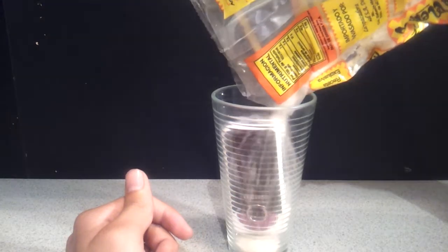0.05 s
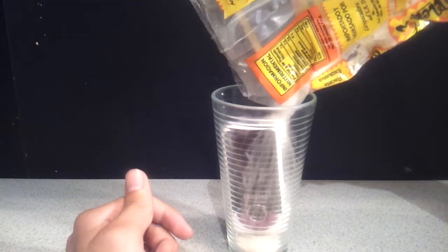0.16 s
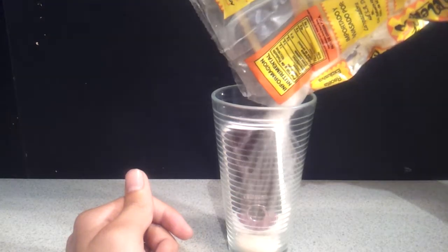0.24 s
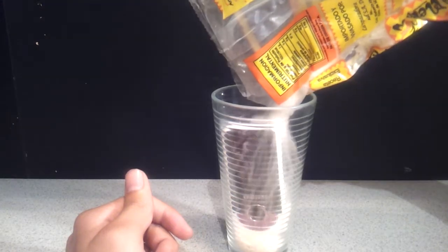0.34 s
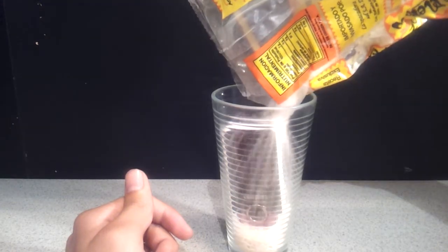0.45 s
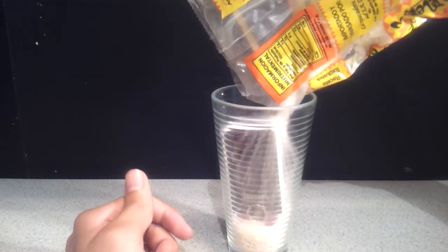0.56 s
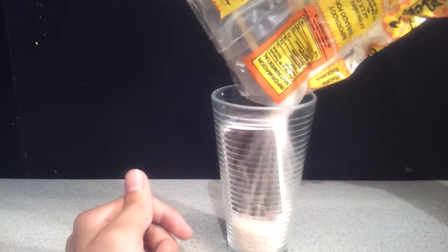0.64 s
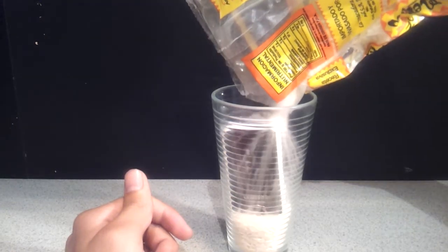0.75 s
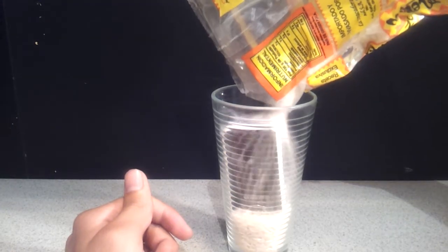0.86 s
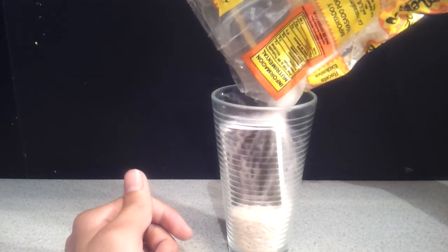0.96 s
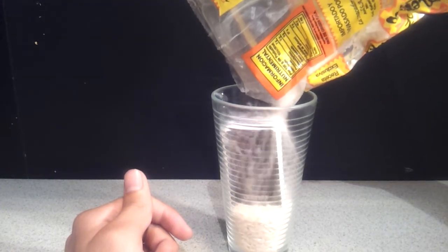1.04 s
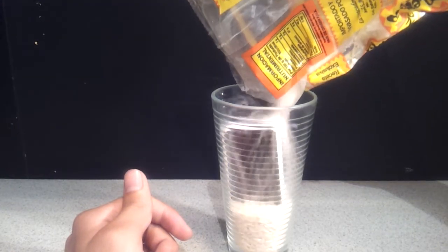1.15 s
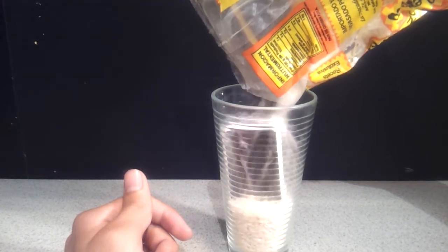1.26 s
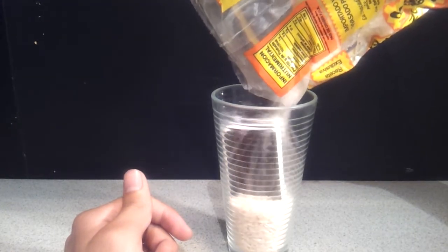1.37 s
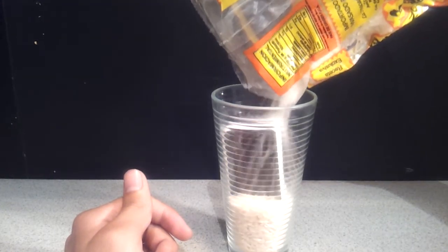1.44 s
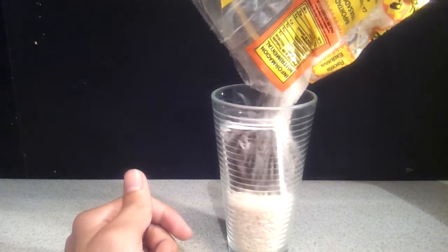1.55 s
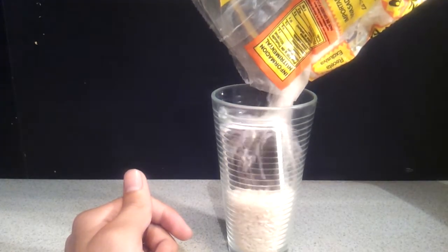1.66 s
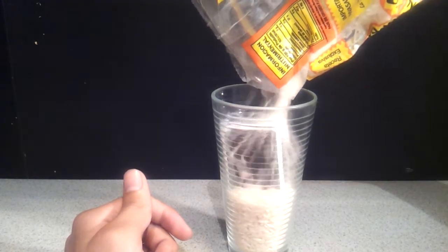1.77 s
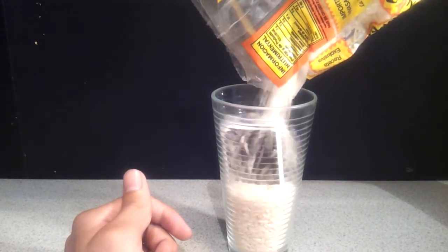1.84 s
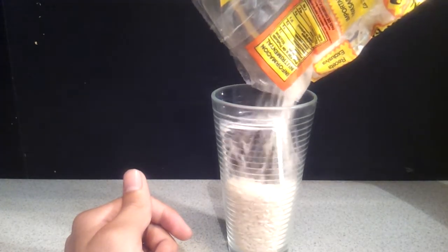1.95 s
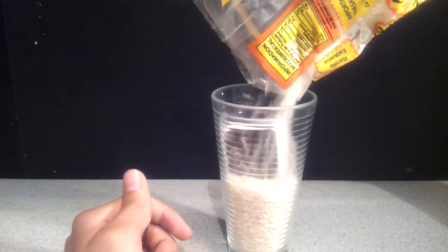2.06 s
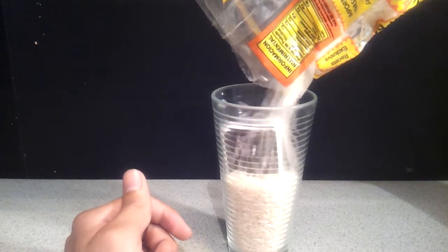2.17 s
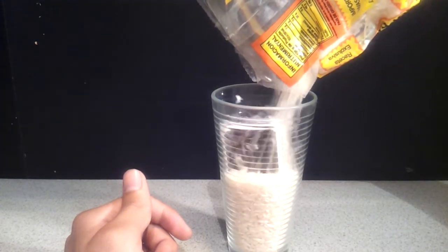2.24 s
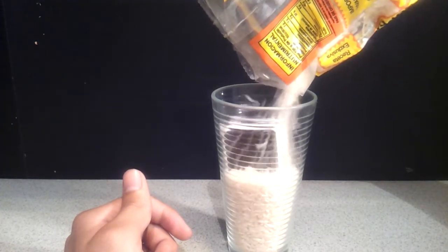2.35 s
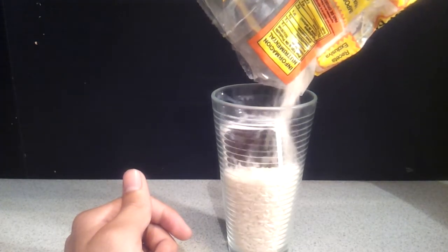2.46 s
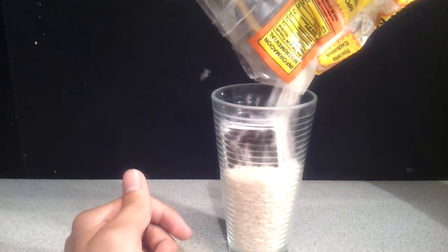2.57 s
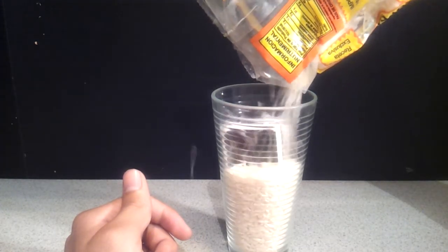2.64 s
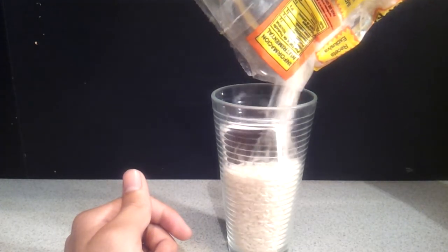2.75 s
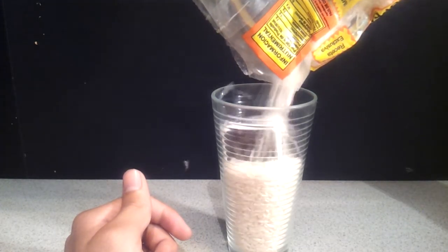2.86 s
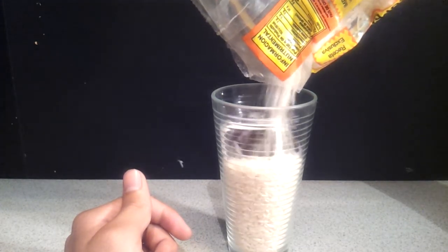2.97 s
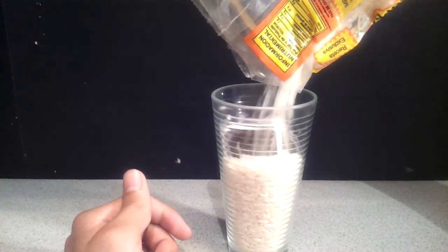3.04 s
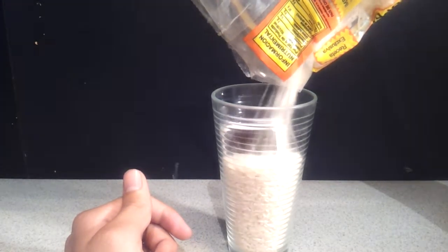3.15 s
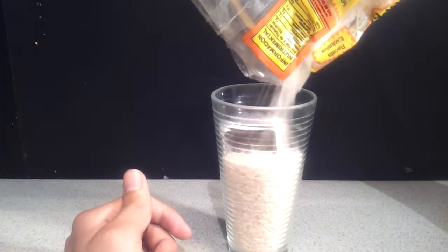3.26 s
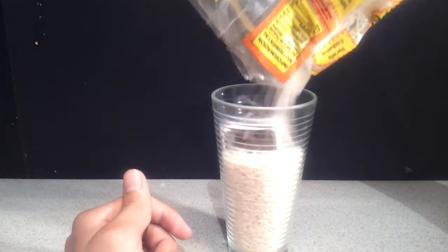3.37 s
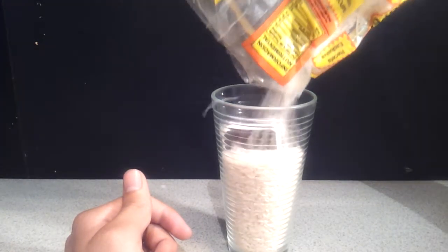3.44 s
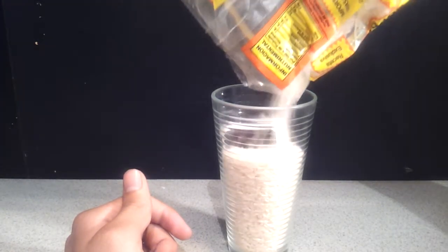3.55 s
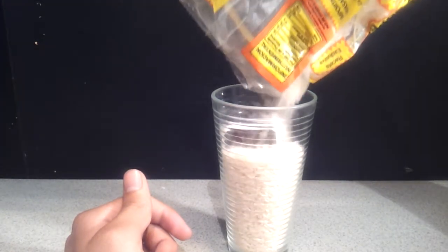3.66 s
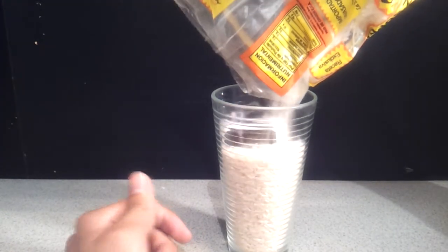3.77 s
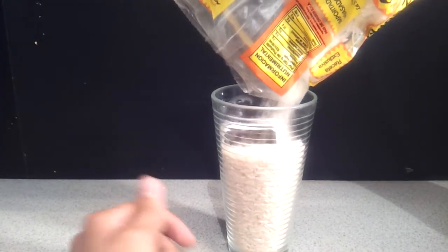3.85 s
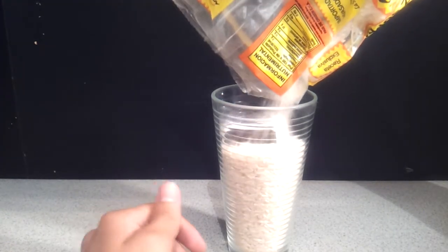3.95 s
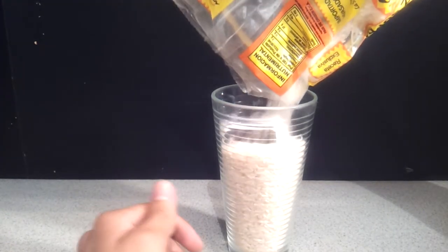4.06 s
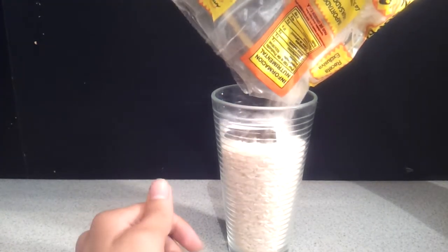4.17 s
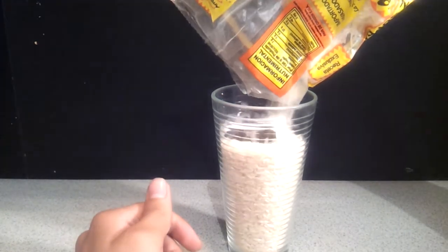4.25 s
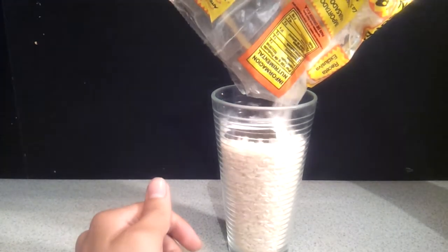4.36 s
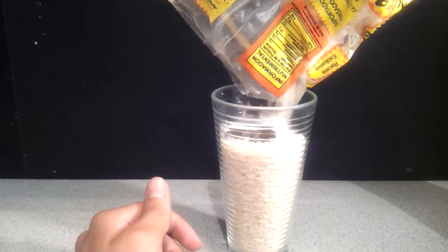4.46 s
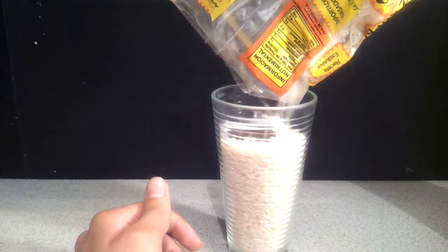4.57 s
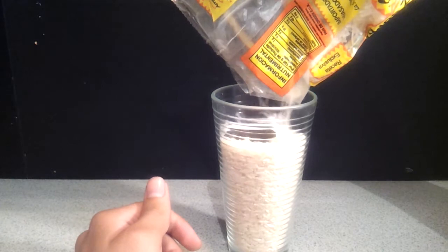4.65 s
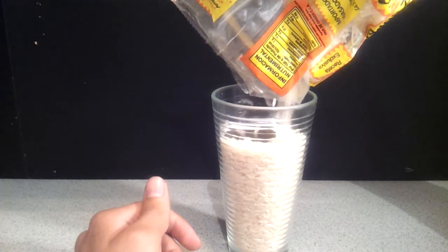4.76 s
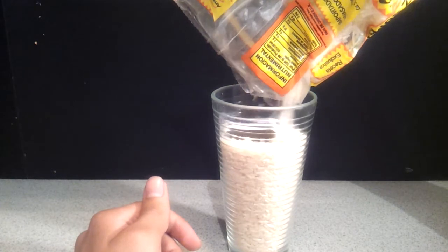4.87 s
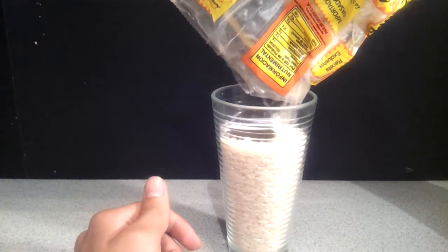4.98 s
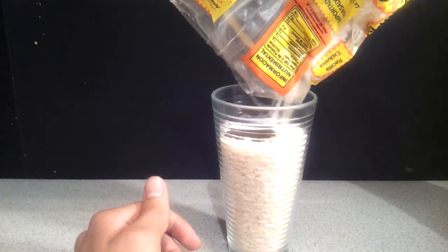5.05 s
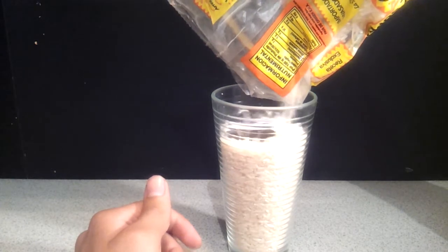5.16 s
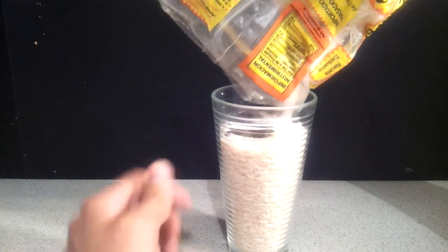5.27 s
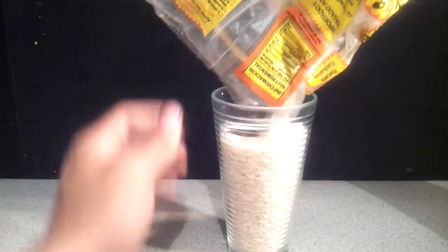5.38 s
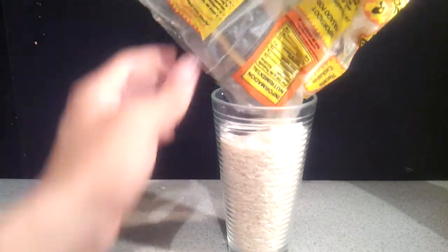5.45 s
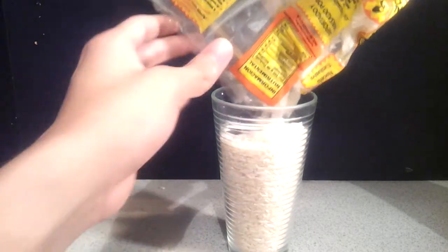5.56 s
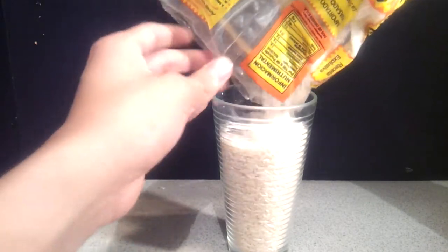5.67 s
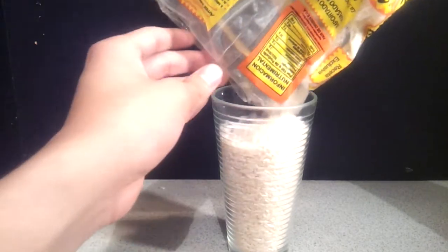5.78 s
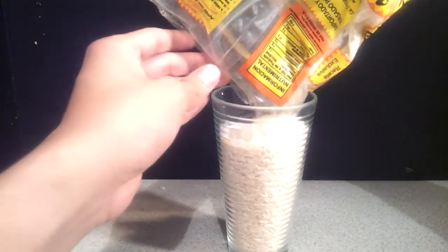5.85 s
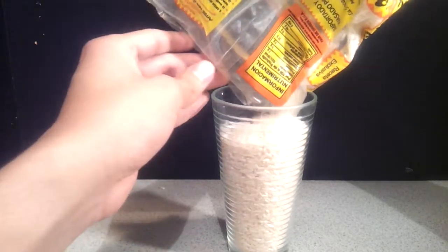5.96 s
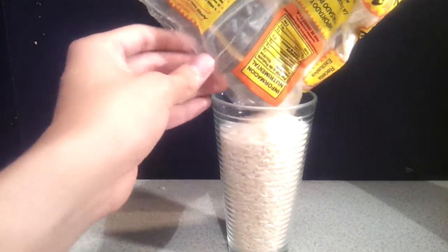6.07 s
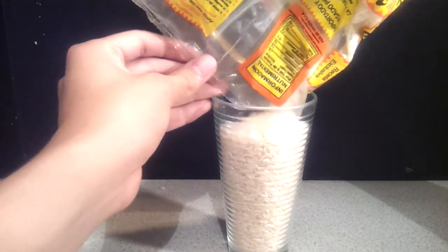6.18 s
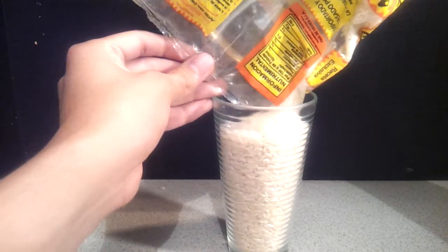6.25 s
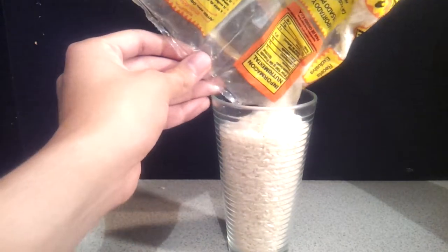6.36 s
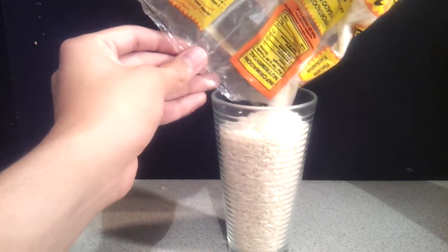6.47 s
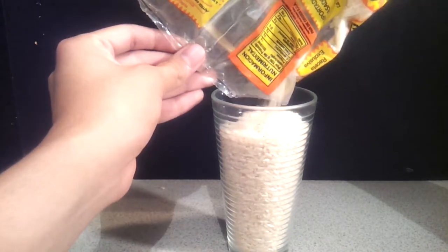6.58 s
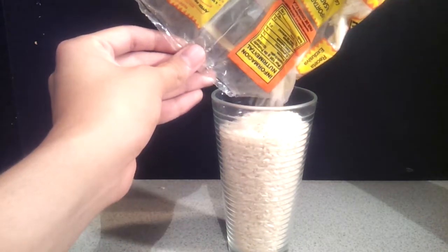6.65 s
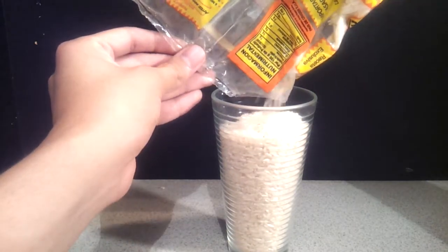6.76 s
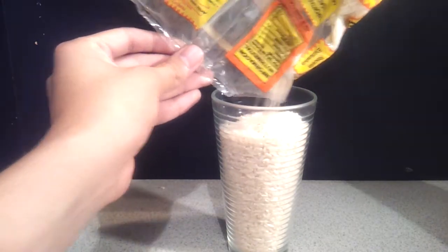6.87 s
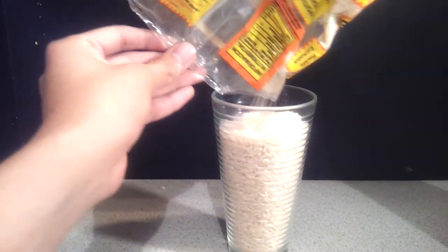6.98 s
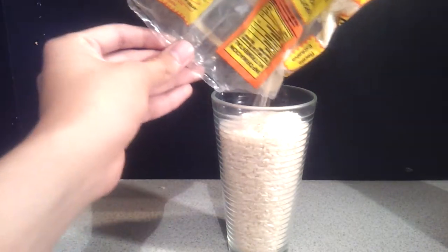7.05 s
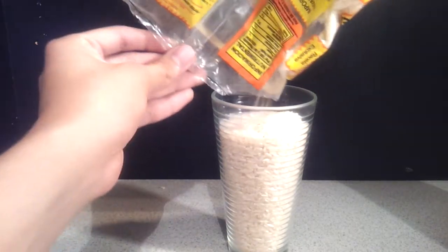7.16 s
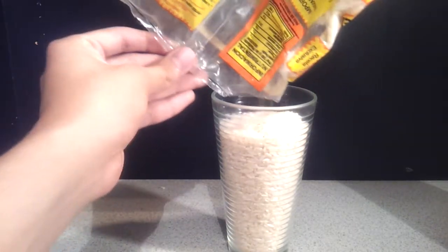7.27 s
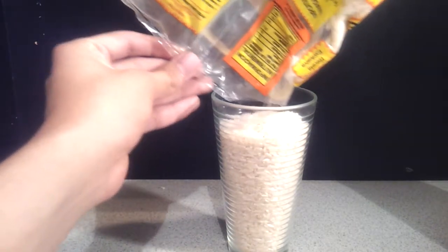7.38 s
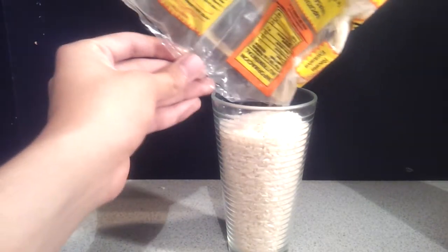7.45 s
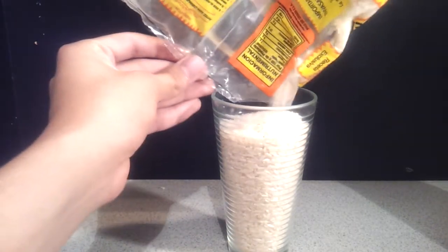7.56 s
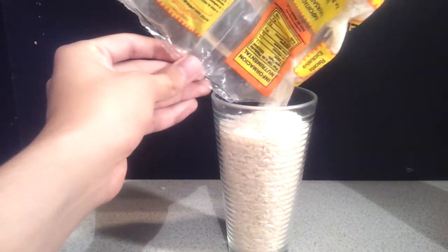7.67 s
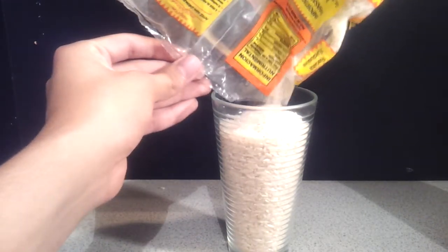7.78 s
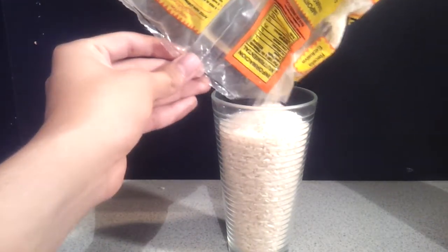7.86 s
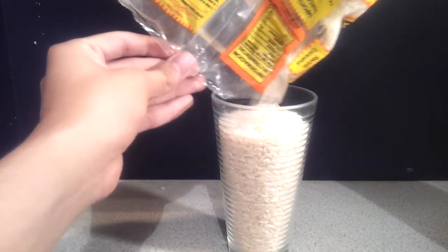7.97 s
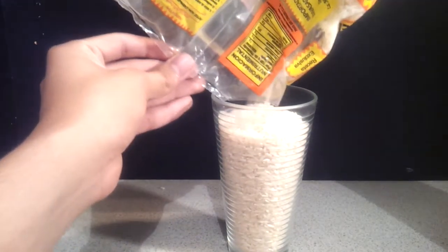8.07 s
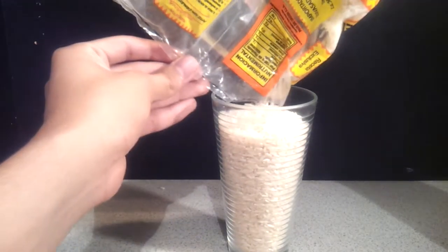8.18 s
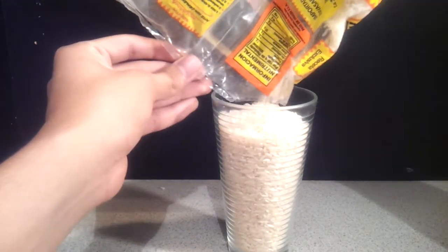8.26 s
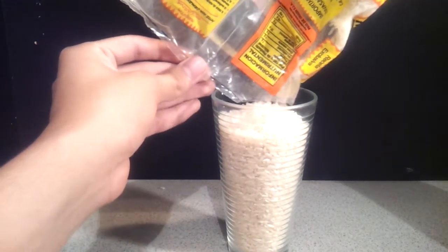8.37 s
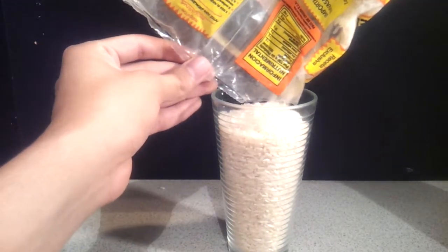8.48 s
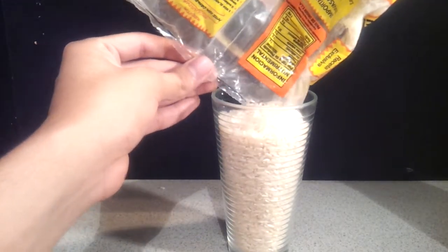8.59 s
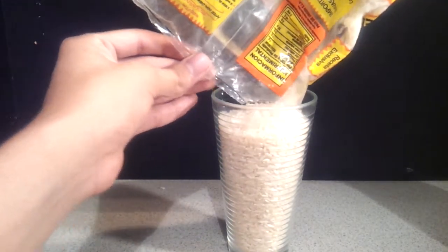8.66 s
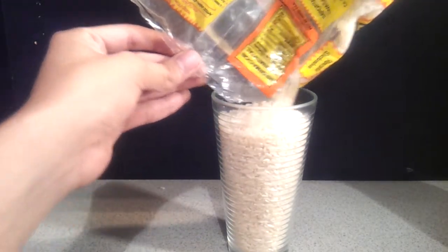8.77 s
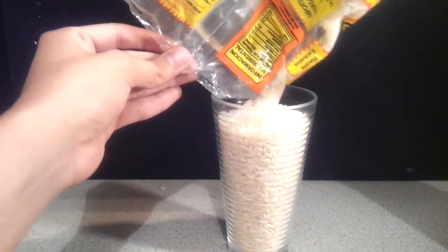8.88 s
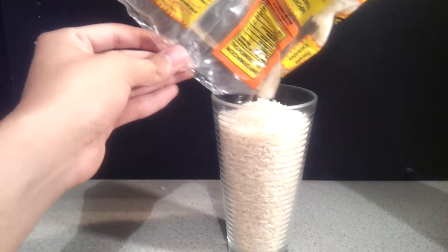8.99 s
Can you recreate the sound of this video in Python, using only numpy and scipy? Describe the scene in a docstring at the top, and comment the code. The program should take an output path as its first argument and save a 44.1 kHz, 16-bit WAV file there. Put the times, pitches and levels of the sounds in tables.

```python
"""Dry rice pours from a plastic bag into a tall glass on a table, heard close up in a small room.
The grains patter on the pile, hiss, and ring the glass until the rising pile chokes its modes.
Clumps tumble out and knock on the pile; the film crackles as a hand shakes out the rest.
One flow curve drives the stream and builds the pile; `fill` is its height as a share of the glass."""
import sys
import numpy as np
from scipy import signal
from scipy.io import wavfile
from scipy.ndimage import uniform_filter1d

SR = 44100
rng = np.random.default_rng(int(sys.argv[2]) if len(sys.argv) > 2 else 0)


def persist_wave(psi):
    """Save psi, clipped to +-1, as 16-bit WAV."""
    counts = np.round(np.clip(psi, -1, 1) * 32767).astype(np.int16)
    wavfile.write(sys.argv[1], SR, np.atleast_2d(counts).T)


N = 397782
TIME = np.arange(N) / SR

# colour of grains landing on the pile: f/Hz, level/dB
PATTER_COLOUR = [(100, -34), (400, -16.5), (800, -6), (990, -8), (1200, 2.5), (1420, -3.5), (1850, 2),
                 (2250, -4), (2420, -3.5), (2700, -4.5), (3500, -7), (5000, -12), (14000, -39.5)]
# modes of the pile in the glass: f/Hz, level/dB, t60/s
PILE_MODES = [(1186, 6.5, 0.013), (1360, 0, 0.015), (1570, -4, 0.044), (1865, 1.5, 0.014),
              (1980, 2.5, 0.028), (2385, -1.5, 0.042), (2810, 5, 0.021), (3240, 3, 0.016)]


def gain_of(db):
    """Decibels to amplitude."""
    return 10 ** (np.asarray(db) / 20)


def unit_rms(x):
    """Scales to rms 1."""
    return x / np.sqrt(np.mean(x ** 2) + 1e-20)


def unit_peak(x):
    """Scales to peak 1."""
    return x / abs(x).max()


def at_hz(points, hz):
    """Reads a curve along a log-frequency axis."""
    f, value = np.transpose(points)
    return np.interp(np.log(hz + 1), np.log(f + 1), value)


def add(mix, s, sound):
    """Lays a sound into the mix at time s."""
    part = mix[:, round(s * SR):][:, :sound.shape[1]]
    part += sound[:, :part.shape[1]]


def pan(lean_db):
    """Left and right gains at constant total power."""
    pair = gain_of([lean_db / 2, -lean_db / 2])
    return pair / np.sqrt(np.mean(pair ** 2, axis=0))


def swells(rows):
    """A sum of bell curves, each with its own rise and fall."""
    return sum(height * np.exp(-((TIME - s) / np.where(TIME < s, rise, fall)) ** 2)
               for s, height, rise, fall in rows)


def follow(flow_db, fill, empty_half_full_db, slope):
    """A fader that rides the height of the pile, plus `slope` dB per dB of flow."""
    return gain_of(np.interp(fill, [0, .5, 1], empty_half_full_db) + slope * flow_db)


def burst(colour, decay_s, tilt_db=0, size=4096, head=0):
    """One stereo contact: a sharp head and dying noise, coloured and tilted by tilt_db per octave."""
    # stereo width: f/Hz, left-right correlation
    correlation = [(100, .9), (400, .95), (1800, .92), (2800, .72), (3300, .8), (4200, .5), (5500, .15),
                   (9000, .03)]
    # stereo balance: f/Hz, left over right/dB
    balance = [(150, 2), (400, .3), (1300, -1.2), (3000, -.7), (5800, 0), (7200, -6), (9000, -9),
               (11000, -7), (14000, -6)]
    hz = abs(np.fft.fftfreq(size, 1 / SR))
    scatter = rng.standard_normal((2, size)) * np.exp(-np.arange(size) / SR / decay_s)
    left, other = np.fft.fft(scatter) + head * np.linalg.norm(scatter[0])
    same = np.clip(at_hz(correlation, hz), 0, 1)
    right = same * left + np.sqrt(1 - same ** 2) * other
    pair = np.array([left, right]) * pan(at_hz(balance, hz))
    shape = gain_of(at_hz(colour, hz) + tilt_db * np.log2(1 + hz / 1000))
    minimum_phase = np.exp(np.conj(signal.hilbert(np.log(shape))))
    return unit_rms(np.fft.ifft(pair * minimum_phase).real) / np.sqrt(size)


def strikes(per_s, spread_db, cap=2.51):
    """Random impacts: mostly small, a few large."""
    strength = gain_of(spread_db * np.minimum(rng.exponential(1, N), cap))
    return strength * rng.choice([-1, 1], N) * (rng.random(N) < per_s / SR)


def shower(hits, colour, decay_s, vary_db=0., count=64, size=1024):
    """Each impact plays one of `count` contacts; vary_db makes some duller and some brighter."""
    contacts = [burst(colour, decay_s, tilt, size) for tilt in vary_db * rng.standard_normal(count)]
    kind = rng.integers(0, count, N)
    out = np.zeros((2, N + size))
    for at in np.flatnonzero(hits):
        out[:, at:at + size] += hits[at] * contacts[kind[at]]
    return unit_rms(out[:, :N])


def room(x, echoes_per_s=3000, predelay_s=.003, size=16384):
    """Sparse reflections of a small room; the treble dies first."""
    # reverb time: f/Hz, t60/s
    reverb_time = [(100, 0.88), (1000, 0.73), (4000, 0.12), (14000, 0.0047)]
    taps = rng.standard_normal((2, size)) * (rng.random((2, size)) < echoes_per_s / SR)
    taps *= np.arange(size) > predelay_s * SR
    hz, t, spectrum = signal.stft(taps, SR, nperseg=256)
    fade = gain_of(-60 * t / at_hz(reverb_time, hz)[:, None])
    tail = signal.istft(spectrum * fade, SR, nperseg=256)[1]
    return signal.oaconvolve(x, tail / np.linalg.norm(tail[0]), axes=1)[:, :N]


def rumble_and_rub(flow_db, fill, rub_db=-54, push_share=0.65, doubling_fill=0.21):
    """A faint low rumble flickers; its level follows the hand's pushes, which also rub the film."""
    # pushes of the free hand: t/s, boost/dB, rise/s, fall/s
    pushes = [(5.55, 9.5, 0.18, 0.1), (6.12, 7, 0.033, 0.25), (7.1, -1.5, 0.13, 0.26)]
    # colour of the low rumble: f/Hz, level/dB
    rumble_colour = [(20, -43), (45, -33), (70, -20), (100, -18), (122, 0), (150, -4), (195, 4.5), (240, 1),
                     (400, -17), (1500, -64)]
    # colour of the hand's dull rub: f/Hz, level/dB
    rub_colour = [(25, -36), (80, -5), (120, 8), (200, -6), (330, 0), (400, 20), (480, -7), (1000, -37)]
    push_db = swells(pushes)
    per_s = 6 * 2 ** (fill / doubling_fill)  # sparse patches at first, steadier as the glass fills
    patches = strikes(per_s, spread_db=2) / np.sqrt(per_s)
    rumble = shower(patches, rumble_colour, decay_s=0.012, size=4096)
    rumble *= follow(flow_db, fill, (-67.5, -63.5, -62.5), slope=-0.14)
    rub = shower(strikes(per_s=330, spread_db=3), rub_colour, decay_s=0.0013, size=4096)
    return rumble * gain_of(push_share * push_db) + rub * gain_of(rub_db) * (gain_of(push_db) - 1)


def bag_thumps():
    """A jolt of the bag makes the rice inside thump."""
    # jolts: t/s, peak/dB
    jolts = [(5.452, -47), (5.54, -38), (6.104, -30), (6.14, -44), (7.06, -39.5), (7.219, -42), (7.4, -37)]
    # colour of a thump: f/Hz, level/dB
    thump_colour = [(30, -23), (60, -15), (90, -6), (130, 0), (240, -4), (340, 10.5), (500, -3),
                    (1500, -38)]
    out = np.zeros((2, N))
    for s, db in jolts:
        add(out, s, gain_of(db) * unit_peak(burst(thump_colour, decay_s=0.014, size=8192)))
    return out


def film_crinkles():
    """The film crinkles softly as rice drags over it."""
    # crinkles: t/s, peak/dB
    crinkles = [(2.487, -19), (2.785, -19), (2.999, -20), (3.068, -20), (3.133, -23), (3.242, -21),
                (3.528, -21), (4.121, -21), (4.135, -18)]
    # colour of a crinkle: f/Hz, level/dB
    crinkle_colour = [(300, -50), (2600, -24), (3500, 1), (4300, -1), (5200, -5), (9000, -9), (14000, -15)]
    out = np.zeros((2, N))
    for s, db in crinkles:
        add(out, s, gain_of(db) * unit_peak(burst(crinkle_colour, decay_s=0.0069)))
    return out


def film_snaps(flap_db=-8, flap_s=0.0066, head=0.63):
    """The film buckles with a bright crack and a hollow knock, then flaps briefly."""
    # snaps: t/s, crack peak/dB, knock peak/dB, decay/s, crack tilt/(dB per octave)
    snaps = [(3.243, -20, -26, .001, -5), (4.71, -13, -23, 0.0022, -2), (5.041, -15, -39, .0022, -1),
             (6.108, -8.5, -16, 0.00099, 1), (6.116, -13, -7, 0.00093, 5), (6.118, -17, -19, .02, 2),
             (6.144, -15, -16, 0.0066, -2), (6.16, -14.5, -33, 0.008, 2), (6.242, -30, -22, .001, 0),
             (6.835, -18.5, -16, 0.00057, -6), (7.0879, -17, -17, 0.0025, -5), (7.097, -33, -23, 0.0011, 0),
             (7.1127, -14, -16.5, .0007, -4), (7.2215, -21.5, -16.5, 0.0026, 6),
             (7.397, -25, -19, 0.0013, 0), (7.422, -30, -23, 0.0011, 7), (7.674, -19, -35, .0072, -7),
             (7.7117, -11, -19, 0.00077, -3), (7.722, -17, -20, 0.017, -4), (7.796, -20, -23, 0.0079, -1),
             (7.816, -17.5, -31, .021, -7.5)]
    # colour of the crack: f/Hz, level/dB
    crack_colour = [(300, -48), (2500, -1), (4500, -1), (5200, 3), (6100, 2), (7000, 7), (8800, 8.5),
                    (11000, 1.5), (14500, -10)]
    # colour of the knock: f/Hz, level/dB
    knock_colour = [(60, -42), (200, -14), (390, -4), (600, -1), (820, 9), (1020, 0), (1250, 2.5),
                    (1750, 7.5), (2600, 0.5), (3600, 4), (4200, 8), (4600, 2), (6000, -8), (14000, -38)]
    out = np.zeros((2, N))
    for s, crack_db, knock_db, decay_s, bright_db in snaps:
        # a quick snap is one sharp buckle, a slow one is a spread of small ones
        sharpness = head * np.exp(-decay_s / flap_s)
        for colour, db, tilt_db in (crack_colour, crack_db, bright_db), (knock_colour, knock_db, 0):
            flap = gain_of(flap_db) * burst(colour, decay_s + flap_s, tilt_db)
            buckle = burst(colour, decay_s, tilt_db, head=sharpness)
            add(out, s, gain_of(db) * unit_peak(buckle + flap))
    return out


def pocket_ticks(flow_db, fill, level_db=-40.5, formed_fill=0.93, fade_db=72, tick_db=-22):
    """Near the brim, grains tick in the small hollow under the bag."""
    # colour of the hollow: f/Hz, level/dB
    pocket_colour = [(300, -45), (780, -3.5), (1000, -11.5), (2700, -59), (3050, -5), (3220, 4.5),
                     (3400, -1.5), (3700, -1), (4200, -14), (5500, -28), (14000, -27)]
    # single grains that stand out: t/s, relative level/dB
    ticks = [(7.152, -4), (7.621, 2), (7.764, -5), (7.855, -13), (7.885, -15), (7.918, -17), (8.123, 1),
             (8.127, -2), (8.145, -3), (8.233, 0.5), (8.3292, 0), (8.417, -2)]
    unformed_db = fade_db * np.maximum(formed_fill - fill, 0)
    out = shower(strikes(per_s=600, spread_db=6.5), pocket_colour, decay_s=0.00025)
    out *= gain_of(level_db + flow_db - unformed_db)
    for s, db in ticks:
        add(out, s, gain_of(db + tick_db) * unit_peak(burst(pocket_colour, decay_s=0.00023)))
    return out


def clump(centre_hz, span_octaves=0.85, grains_per_s=1900, trail_db=-6.5, trail_s=0.0043,
          click_db=-3, attack_s=0.00016, width_rad=0.75, detune=0.027, size=2048):
    """A leading grain and a short trail of others knock the pile, ringing it most near one pitch."""
    t = np.arange(size) / SR
    grains = rng.standard_normal(size) * (rng.random(size) < grains_per_s / SR)
    grains *= gain_of(trail_db) * np.exp(-t / trail_s)
    grains[0] = 1
    ring = np.zeros((2, size))
    for hz, db, t60 in PILE_MODES:
        hz = hz * (1 + detune * rng.standard_normal())  # the pile shifts between blows
        phase = rng.uniform(0, 2 * np.pi) + width_rad * rng.standard_normal((2, 1))
        weight = 2 ** -(np.log2(hz / centre_hz) / span_octaves) ** 2
        ring += weight * gain_of(db - 60 * t / t60) * np.sin(2 * np.pi * hz * t + phase)
    ring = unit_peak(ring * (1 - np.exp(-t / attack_s)))
    click = gain_of(click_db) * unit_peak(burst(PATTER_COLOUR, decay_s=0.00081, size=size))
    return unit_peak(signal.fftconvolve(ring + click, grains[None], axes=1))


def falling_clumps(flow_db, trim_db=-1.5, crumb_count=30, crumb_db=-28, crumb_end_s=5.9):
    """Large clumps land on cue; crumbs fall at random while the rice still has some way to drop."""
    # large clumps: t/s, relative level/dB, centre f/Hz
    large_clumps = [(0.1301, -26, 2410), (0.5487, -32, 1900), (0.9193, -15, 1740), (1.4217, -18.5, 1900),
                    (1.5095, -18.5, 1210), (1.6057, -25, 1740), (1.6721, -11, 2000), (1.7449, -21, 1580),
                    (2.0981, -18, 2440), (2.1216, -13.5, 2000), (3.0879, -15, 1790), (3.3014, -20.5, 1800),
                    (3.466, -20, 1840), (3.5129, -11.5, 1900), (3.5264, -12, 1940), (4.1195, -22, 1970),
                    (4.153, -30, 2010), (4.2368, -22, 1230), (4.3774, -16, 1700), (4.3954, -10.5, 1820),
                    (4.4298, -14.5, 1930), (4.4558, -18, 1580), (4.4862, -20, 1500), (4.5104, -17, 1200),
                    (4.5431, -21, 1960), (4.5506, -16, 2000), (4.5725, -16, 2020), (4.5864, -26, 1850),
                    (4.6079, -16.5, 1600), (4.6369, -18, 1960), (4.6932, -12.5, 2020), (4.7087, -17, 1270),
                    (4.7154, -15.5, 1930), (4.7536, -21, 1840), (4.79, -14.5, 1210), (4.8064, -19, 2040),
                    (4.8155, -16, 2730), (4.8434, -19, 1200), (4.8554, -19, 1150), (4.8874, -15, 2020),
                    (4.8983, -13.5, 1780), (4.9626, -26, 1260), (5.0215, -16, 1840), (5.0379, -12.5, 2010),
                    (5.3941, -18.5, 1330), (5.437, -15, 1210), (5.456, -13, 1530), (5.5024, -13, 1250),
                    (5.5363, -14, 1800), (5.598, -24, 1620), (5.679, -17, 1250), (5.7294, -18, 1870),
                    (5.7788, -20, 1990), (6.0891, -26, 1670), (6.3939, -23, 1810), (6.5784, -20, 2110)]
    crumbs = []
    for at in (rng.random(crumb_count) * crumb_end_s * SR).astype(int):
        mode_hz = PILE_MODES[rng.integers(len(PILE_MODES))][0]
        crumbs.append((at / SR, crumb_db + flow_db[at], mode_hz))
    out = np.zeros((2, N))
    for s, db, hz in list(large_clumps) + crumbs:
        add(out, s, gain_of(db + trim_db) * clump(hz))
    return out


def wall_splashes():
    """The stream swings against the bare wall and sprays off it in short, bright rushes."""
    # rushes: t/s, level/dB, rise/s, fall/s
    rushes = [(0.606, -24.5, .004, .012), (0.735, -28, 0.013, .015), (0.859, -22, 0.0089, .012),
              (0.89, -26, .015, .03), (0.949, -31, 0.023, 0.034), (0.998, -31, 0.011, 0.083),
              (1.14, -32, 0.033, 0.023), (1.621, -29.5, 0.056, 0.088)]
    # colour of the spray: f/Hz, level/dB
    spray_colour = [(300, -46), (5500, -20), (7400, -0.5), (9500, 0.5), (11000, -9), (14500, -10)]
    envelope = swells([(s, gain_of(db), rise, fall) for s, db, rise, fall in rushes])
    return shower(strikes(per_s=3000, spread_db=3.5), spray_colour, decay_s=.001) * envelope


def glass_ring(flow_db, fill, empty_per_s=1700, halving_fill=0.18, skid_s=.002, uneven_db=1.5,
               clink_db=-1, clink_span_hz=300, spill_db=-16):
    """Wall strikes ring the modes; the pile moves the point of impact up and chokes them in turn."""
    # glass modes: f/Hz, level/dB, t60/s, left over right/dB, fill that rings best,
    # fill offset for -6 dB, drift/(Hz per glass height)
    glass_modes = [(4620, -38, .14, 5, .38, .28, 0), (5852, -41.5, .045, 1, .07, .25, -60),
                   (7364, -52, .05, -8, .2, .3, 0), (7590, -49, .02, -8, .2, .2, 0),
                   (7915, -45, .05, -12, .5, .4, -60), (7964, -34, .11, -12, .47, .33, 40),
                   (8803, -33.3, .1, -6.5, .25, .18, 110), (8865, -41.5, .025, -12, .38, .24, 280),
                   (11865, -44, .02, -8, .18, .22, -260), (12165, -44.5, .06, -6, .72, .45, 40),
                   (13170, -39.5, .025, -6, .38, .23, 0), (13297, -42, .05, -8, .12, .26, -180)]
    # single hard grains on wall and rim: t/s, level/dB, f/Hz that rings most
    clinks = [(0.287, -35, 4620), (0.715, -27, 7950), (0.884, -21, 8820), (0.914, -22, 4620),
              (1.081, -30, 4620), (1.14, -23, 8820), (1.623, -22.5, 7950), (1.897, -23, 4620),
              (2.888, -28, 4620), (3.118, -40, 7950), (3.313, -26, 4620), (3.622, -21, 7950),
              (3.664, -23.5, 7950), (3.77, -27, 4620), (4.209, -40, 4620), (4.505, -30, 4620),
              (4.702, -27, 7950), (5.073, -23.5, 7950), (5.141, -46, 4620), (5.304, -24.5, 7950),
              (5.687, -23.5, 7950), (6.8, -37, 12165), (7.045, -34, 12165), (7.95, -30, 7950),
              (7.97, -29, 12165), (8.002, -30, 7950), (8.631, -29, 7950), (8.731, -32, 7950)]
    per_s = empty_per_s * 2 ** (-fill / halving_fill)
    hits = unit_rms(strikes(per_s, spread_db=3.5) / np.sqrt(per_s))
    hits *= follow(flow_db, fill, (2.5, -4.5, -11), slope=0.4)
    t = np.arange(SR // 6) / SR
    out = np.zeros((2, N))
    for hz, db, t60, lean_db, best_fill, span, drift in glass_modes:
        # a grain skids along the wall, so its ring swells for a moment
        envelope = gain_of(-60 * t / t60) * (1 - np.exp(-t / skid_s))
        unchoked = 2 ** -((fill - best_fill) / span) ** 2
        # where a strike lands around the wall sets how strongly each side hears the mode
        place = np.sqrt(2) * np.cos(rng.uniform(0, 2 * np.pi, N) + np.array([[0], [np.pi / 3]]))
        # each strike favours some modes, so the ring breaks into separate pings
        favour = unit_rms(gain_of(uneven_db * np.clip(rng.standard_normal(N), -2, 2)))
        drive = hits * place * favour * unchoked * gain_of(db) * np.sqrt(2) / np.linalg.norm(envelope)
        for s, hit_db, clink_hz in clinks:
            nearness = 2 ** -((hz - clink_hz) / clink_span_hz) ** 2
            spill = gain_of(spill_db) * unchoked[round(s * SR)]
            add(drive, s, max(nearness, spill) * gain_of([[hit_db + clink_db]]))
        # the rice presses on the wall and slowly detunes the mode
        carrier = np.exp(2j * np.pi * np.cumsum(hz + drift * (fill - best_fill)) / SR)
        ringing = signal.oaconvolve(drive / carrier, envelope[None], axes=1)[:, :N]
        out += (carrier * ringing).imag * pan(lean_db)[:, None]
    return out


def hollow(x):
    """The hollow resonance of pile and bag."""
    # resonances: f/Hz, bandwidth/Hz, level/dB
    resonances = [(1254, 47, 0), (1658, 37, 2.5), (1866, 55, -0.5), (2080, 49, -8), (3130, 110, -2),
                  (4200, 200, -9.5)]
    return sum(gain_of(db) * signal.lfilter(*signal.iirpeak(hz, hz / width, fs=SR), x)
               for hz, width, db in resonances)


def spurts(size=800):
    """The stream leaves the bag in uneven spurts, some tens a second."""
    return unit_rms(uniform_filter1d(uniform_filter1d(rng.standard_normal(N), size), size // 2))


def pile_height(flow_db, first_fill=0.049, taper=0.75):
    """The pile grows to the brim with the rice poured, more slowly as the glass widens."""
    poured = np.cumsum(gain_of(flow_db))
    return first_fill + (1 - first_fill) * (poured / poured[-1]) ** taper


def rice_stream(flow_db, fill, air_db=5, air_hz=10500, spurt_db=1.94):
    """The stream patters and thuds on the pile, slides over the film and hisses on itself."""
    # colour of the low thud of landing: f/Hz, level/dB
    thud_colour = [(150, -34), (250, -8.5), (330, 2), (395, 3), (460, -3.5), (530, 5.5), (610, -3),
                   (730, 3.5), (850, -1.5), (1000, -10.5), (1500, -23), (4000, -31)]
    # colour of rice sliding on film: f/Hz, level/dB
    slide_colour = [(200, -37.5), (1000, -5.5), (1500, 1.5), (2400, 3), (2950, 1.5), (3200, -2.5),
                    (3800, -1), (4200, 5.5), (4550, 0), (5200, -0.5), (6100, 0), (7200, 3), (9000, -1.5),
                    (14000, -16)]
    # colour of the hiss: f/Hz, level/dB
    hiss_colour = [(300, -57), (2500, -0.5), (5000, 4.5), (6500, 2.5), (7500, 6.5), (8800, 8), (10000, 2),
                   (11500, 4), (13000, 3.5), (14500, -1.5)]
    landing = strikes(per_s=900, spread_db=3)  # all four layers share these hits
    patter = shower(landing, PATTER_COLOUR, decay_s=0.0021, vary_db=1.5)
    patter *= follow(flow_db, fill, (-40, -44, -41), slope=1.25)
    thud_hits = landing + strikes(per_s=900, spread_db=4.5)
    thud = shower(thud_hits, thud_colour, decay_s=0.0022, count=128, size=2048)
    thud *= follow(flow_db, fill, (-46, -49, -48.5), slope=1.04)
    slide_hits = 0.34 * landing + strikes(per_s=1400, spread_db=2.5)
    slide = shower(slide_hits, slide_colour, decay_s=0.0013, vary_db=2.5)
    slide *= follow(flow_db, fill, (-33, -43.5, -38), slope=0.82)
    hiss_hits = .5 * landing + strikes(per_s=6000, spread_db=6.5)
    hiss = shower(hiss_hits, hiss_colour, decay_s=0.0036)
    hiss *= follow(flow_db, fill, (-33, -37, -47), slope=0.45)
    # rice on rice is softer than rice on glass, so the top fades as the pile grows
    air = signal.sosfiltfilt(signal.butter(2, air_hz, "high", fs=SR, output="sos"), hiss)
    hiss += air * (gain_of(air_db * (1 - fill)) - 1)
    rustle = (patter + slide) * gain_of(spurt_db * spurts())
    return rustle + fill * hollow(rustle) + thud + hiss


def scene(room_db=-14, low_cut_hz=240):
    """Rice, glass and bag in the room, led by the flow and the pile that it builds."""
    # steady flow, set by the tilt of the bag: t/s, level/dB
    steady_flow = [(0.0, -0.5), (0.7, 0.16), (1.28, -2), (1.9, 1.5), (2.7, 0.9), (3.2, 3.5), (3.8, 0.6),
                   (4.3, 1.4), (4.8, 2), (5.15, -1.5), (5.9, -2), (6.25, 3), (7.0, -5.5), (7.08, -7),
                   (7.18, -10), (7.25, -5.5), (7.5, -4.5), (8.5, 0.14), (9.02, -7.5)]
    # gushes, when a mass of rice lets go: t/s, boost/dB, rise/s, fall/s
    gushes = [(.92, 3, 0.11, 0.26), (1.62, 4, 0.25, 0.09), (5.56, 11, 0.23, 0.2), (6.12, 6, 0.037, 0.056),
              (7.76, 5.5, 0.47, 0.21)]
    flow_db = np.interp(TIME, *np.transpose(steady_flow)) + swells(gushes)
    fill = pile_height(flow_db)
    pour = rice_stream(flow_db, fill) + pocket_ticks(flow_db, fill) + glass_ring(flow_db, fill)
    pour += wall_splashes() + falling_clumps(flow_db)
    # grains are too light to make bass
    pour = signal.sosfilt(signal.butter(5, low_cut_hz, "high", fs=SR, output="sos"), pour, axis=1)
    bag = film_snaps() + film_crinkles() + bag_thumps()
    direct = pour + bag + rumble_and_rub(flow_db, fill)
    return direct + gain_of(room_db) * room(direct)


def record(dry, edge_hz=14550):
    """A steep low-pass trims the very top."""
    low_pass = signal.firwin(511, edge_hz, window=("kaiser", 9), fs=SR)
    return signal.oaconvolve(dry, low_pass[None], "same", axes=1)


dry = scene()
out = record(dry)
persist_wave(out)
```